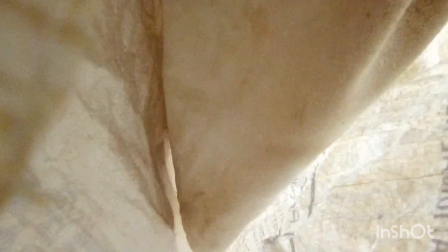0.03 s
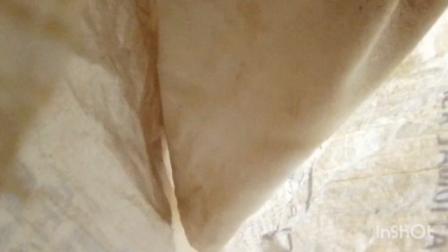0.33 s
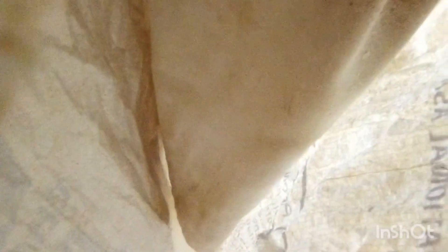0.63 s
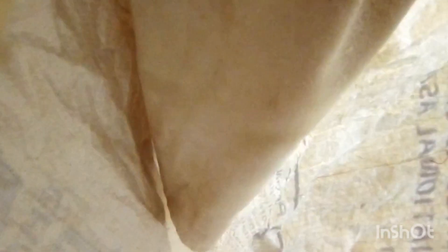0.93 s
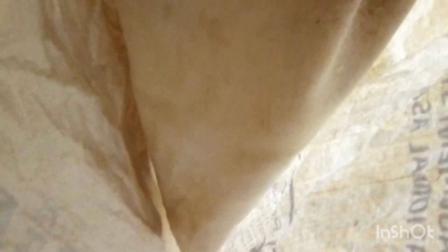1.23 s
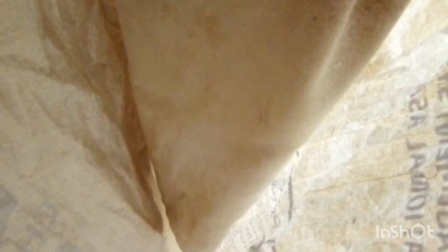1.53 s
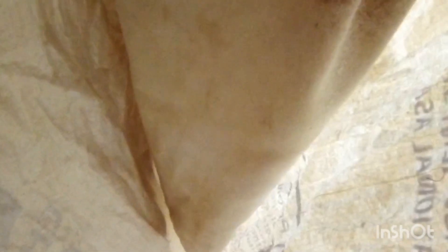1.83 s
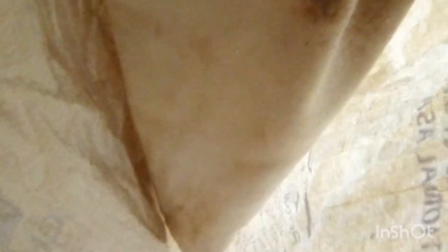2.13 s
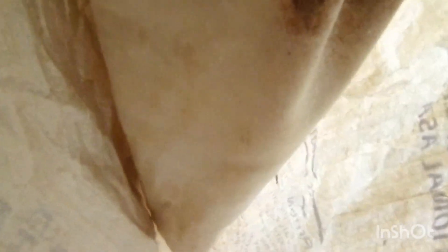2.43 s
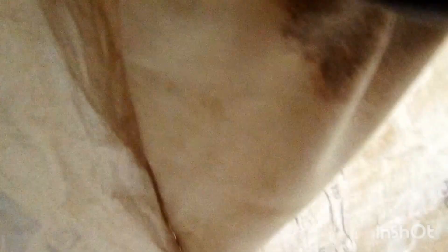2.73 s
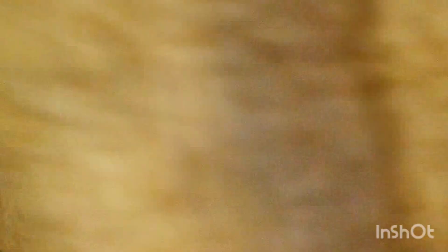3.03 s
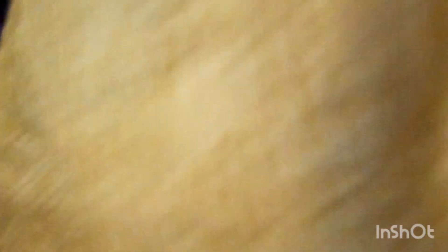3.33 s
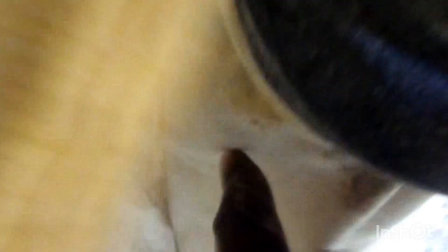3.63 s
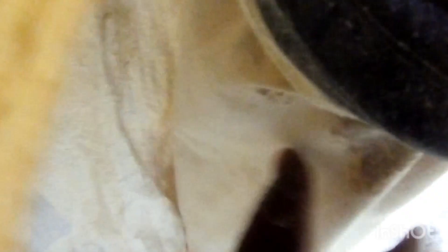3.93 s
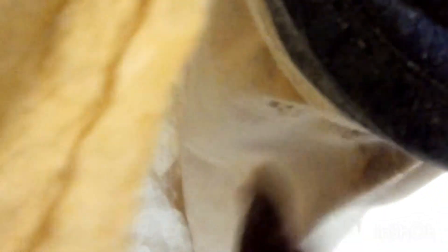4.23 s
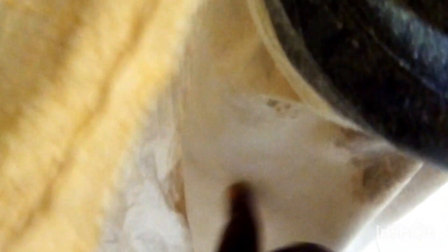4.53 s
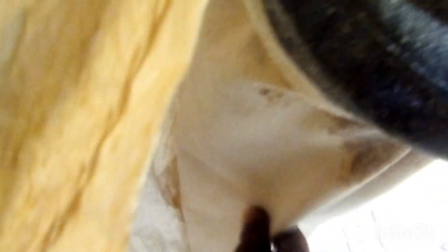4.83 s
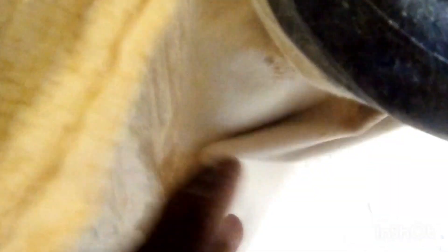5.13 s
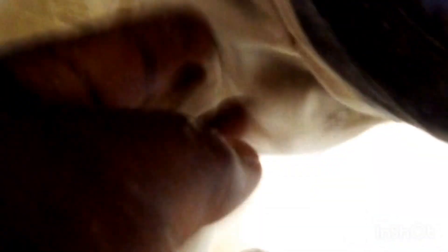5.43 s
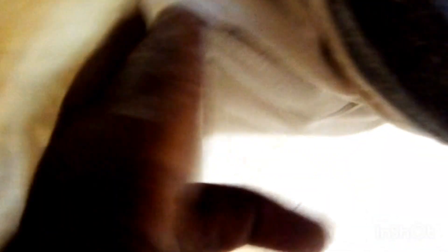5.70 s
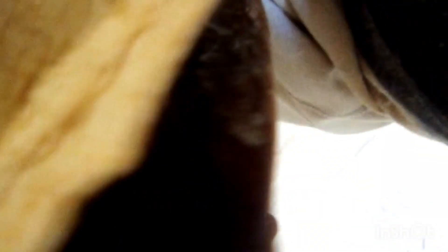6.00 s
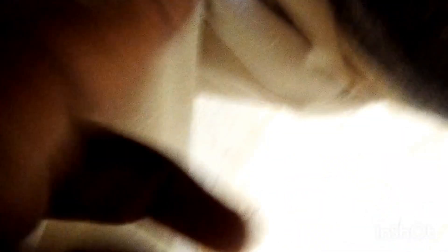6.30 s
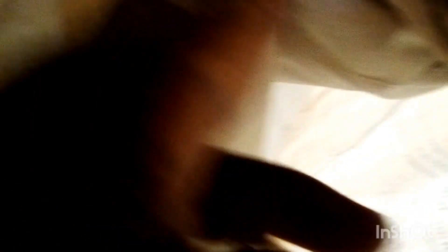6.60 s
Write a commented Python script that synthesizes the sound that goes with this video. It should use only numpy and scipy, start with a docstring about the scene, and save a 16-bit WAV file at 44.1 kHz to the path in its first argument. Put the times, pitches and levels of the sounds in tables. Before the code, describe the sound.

An electric grain mill runs without a break, heard from close by. Grain rushing against the steel casing makes a loud, bright hiss, over the rotor's deep hum, a roar of air and a light buzzing rattle. The hiss swells and dips slightly as the feed varies. In the second half, a few single kernels tick faintly on the spout. The microphone moves from the cloth outlet sack up to the spout, changing the tone only a little.

```python
"""An electric grain mill

Grain hisses against the steel casing, and now and then a single kernel ticks on the spout.
The rotor hums at 65 turns a second, with side tones from a slower shaft or bearing, and drives
roaring air through the casing. The listener moves from the cloth sack on the outlet up to the spout."""
import sys
import numpy as np
from scipy import signal
from scipy.fft import rfft, irfft, next_fast_len
from scipy.io import wavfile
from scipy.ndimage import uniform_filter1d, map_coordinates

SR = 44100
rng = np.random.default_rng(int(sys.argv[2]) if len(sys.argv) > 2 else 0)


def store_wav(level_fs):
    """Save 16-bit WAV to argv[1]."""
    pcm = np.round(np.clip(np.atleast_2d(level_fs), -1, 1) * 32767)
    wavfile.write(sys.argv[1], SR, pcm.T.astype(np.int16))


N = 293706
TIME = np.arange(N) / SR
ROTOR_HZ, SLOW_HZ = 65.055, 24.87


def grain(clock, place, flow_db, clump_db=0.5, fine_clump_db=1.0, throb=0.048):
    """Impact excitation: clumps of grain ring the steel near 4.6 kHz; fine meal adds a thin spray."""
    # Each row of these spectra: frequency in Hz, relative spectral density in dB.
    steel_spectrum = [(100, -50), (900, -25), (2000, -18.5), (2800, -14), (3500, -8), (4000, -2), (4600, 0),
                      (5100, -3.5), (5600, -10.5), (6100, -14.5), (6650, -18.5), (7000, -25), (7500, -29),
                      (8000, -39.5), (11000, -68)]
    spray_spectrum = [(5000, -28), (8200, 0.5), (9500, 0), (10500, -5.5), (11300, -10), (12300, -15),
                      (13400, -17), (15400, -26)]
    sizzle_spectrum = [(7000, -25), (8700, -5), (9800, 1), (10700, -5), (11500, -13), (13400, -16),
                       (15400, -20)]
    # Each row: time in seconds, levels of steel and of spray in dB at an even feed.
    levels = [(0, -18.5, -53), (1.0, -19, -54), (2.7, -19, -54.5), (3.5, -18.5, -53.6), (4.3, -18.6, -52),
              (5.2, -19, -53.8), (6.66, -19.5, -54)]
    clumps = drift(44)
    pulsation = 1 + throb * np.sin(2 * np.pi * (ROTOR_HZ + 2 * SLOW_HZ) * clock)
    steel = coloured(impacts(per_s=22000, spread_db=2.1) * pulsation, steel_spectrum)
    steel = strike_colour(steel, bright_db=0.26 * flow_db + 0.45 * drift(14))
    spray = coloured(impacts(per_s=14000, spread_db=2.2), spray_spectrum)
    sizzle = coloured(impacts(per_s=5000, spread_db=2.0), sizzle_spectrum)
    share = 0.4 * np.clip(place, 0, 1)  # the spout sizzles once the sack no longer covers it
    meal = np.sqrt(1 - share) * spray + np.sqrt(share) * sizzle
    steel_db = curve(levels, column=1) + flow_db + clump_db * clumps
    meal_db = curve(levels, column=2) + 1.2 * flow_db + fine_clump_db * clumps
    return steel * gain_of(steel_db) + meal * gain_of(meal_db)


def strike_colour(x, bright_db, patchy_db=0.71, patch_hz=700, patch_s=0.038, pivot_hz=4900):
    """Timbre depends on the blow: it shifts with the spot struck, and harder blows ring brighter."""
    hz, t, spectra = signal.stft(x, SR, nperseg=512, noverlap=384)
    patches = rng.standard_normal(spectra.shape)
    patches = uniform_filter1d(patches, round(patch_hz / hz[1]), axis=0)
    patches = unit_rms(uniform_filter1d(patches, round(patch_s / t[1]), axis=1))
    shelf = np.tanh(2 * np.pi * np.log((hz[:, None] + 1) / pivot_hz))
    spectra *= gain_of(patchy_db * patches + shelf * np.interp(t, TIME, bright_db))
    return unit_rms(signal.istft(spectra, SR, nperseg=512, noverlap=384)[1][:N])


def feed(uneven_db=0.29):
    """Modulation by the flow of grain, in dB: slightly uneven, with a bump for each slug or gap."""
    # Each row: midpoint and length in seconds, change of flow in dB (slug +, gap -).
    surges = [(.89, .14, -1.7), (1.288, 0.14, 2.3), (1.777, 0.072, 2), (2.26, 0.068, 1.5),
              (2.586, 0.084, -3.5), (2.802, 0.047, 1.8), (3.3, 0.087, 2.8), (3.487, .09, 3),
              (3.9, .07, 2.2), (4.05, .07, 2), (4.47, 0.17, -2), (4.564, 0.063, 2.5), (6.28, .07, 3)]
    flow_db = uneven_db * drift(14)
    for middle, length, db in surges:
        flow_db += db * np.cos(np.pi * np.clip((TIME - middle) / length, -.5, .5)) ** 2
    return flow_db


def rotor_drone(clock, waver_db=0.2):
    """Periodic forcing: two pulses to each turn of the rotor give the deep main tone."""
    # Each row: time in seconds, level in dB.
    levels = [(0, -29.3), (2.15, -29.5), (2.42, -29.5), (2.53, -29), (2.63, -29), (2.95, -28.5), (3.2, -28),
              (3.4, -30.5), (3.88, -28), (4.22, -28), (4.4, -33), (4.49, -25), (4.58, -29), (5.9, -27.5),
              (6.5, -27), (6.66, -25.5)]
    level_db = curve(levels) + waver_db * drift(8.2)
    return np.sqrt(2) * gain_of(level_db) * np.sin(2 * np.pi * 2 * ROTOR_HZ * clock)


def rotor_hum(clock, place, harmonic_gain_db=0.38):
    """Harmonics and sidebands: the rotor's tones vary with place; the slow rotation adds side tones."""
    # Each row: harmonic number, relative levels in dB by the sack, by the spout and under the spout.
    harmonics = [(1, -45.5, -45.5, -45), (3, -32, -35.5, -33), (4, -37, -62, -45.5), (5, -42.5, -57, -45.5),
                 (6, -36, -35.5, -41), (7, -33, -39.5, -38), (8, -47, -39.5, -34.5), (9, -45, -43.5, -43),
                 (10, -35.5, -35, -33), (11, -43, -43, -40), (12, -58, -45, -55), (13, -54, -51, -50),
                 (14, -45, -46, -43)]
    # Each row: multiple of the rotor's speed, multiple of the slow speed added to it, level in dB.
    sidebands = [(1, 3, -45.5), (4, -2, -44.5), (4, -1, -44.5), (5, -1, -44), (7, 2, -40.5), (8, -1, -43),
                 (8, 1, -46), (9, -2, -46.5), (9, 2, -42), (11, 2, -48.5), (17, -1, -51)]

    def tone(hz, waver):
        amplitude = np.sqrt(2) * (1 + waver * drift(2.25))
        return amplitude * np.sin(2 * np.pi * (hz * clock + rng.random()))

    main = sum(np.interp(place, [0, 1, 2], gain_of(levels)) * tone(n * ROTOR_HZ, waver=0.15)
               for n, *levels in harmonics)
    sides = sum(gain_of(db) * tone(n * ROTOR_HZ + m * SLOW_HZ, waver=0.23) for n, m, db in sidebands)
    return gain_of(harmonic_gain_db) * main + sides


def air(gust_db=1.04):
    """Turbulence: the air that the rotor drives through the casing makes a gusty broadband roar."""
    # Each row: frequency in Hz, relative spectral density in dB.
    spectrum = [(20, -29), (55, -26), (90, -6), (122, 3), (165, -6.5), (205, 0), (250, 1.5), (315, 2),
                (400, -1.5), (600, 0.5), (760, -7), (930, -2), (1020, -8.5), (1350, -6), (1650, -12),
                (3500, -32), (9000, -58)]
    return coloured(rng.standard_normal(N), spectrum) * gain_of(gust_db * drift(12))


def casing_rattle(clock):
    """Intermodulation: the casing buzzes on a dense comb of combination tones of the two rotations."""
    # Each row: frequency in Hz, relative level of the tones in dB.
    spectrum = [(150, -31), (220, -3), (550, 0), (800, -5.5), (1400, -10), (2600, -14)]
    hz = (np.arange(3, 40)[:, None] * ROTOR_HZ + np.arange(-4, 5) * SLOW_HZ).ravel()
    size = next_fast_len(2 * N)
    phasors = np.exp(2j * np.pi * rng.random(len(hz)))
    comb = np.zeros(size // 2 + 1, complex)
    comb[np.round(hz * size / SR).astype(int)] = gain_at(spectrum, hz) * phasors
    buzz = irfft(comb, size)
    return unit_rms(map_coordinates(buzz, [clock * SR], order=1, mode="wrap"))  # follows the speed


def kernel_ticks(t60_s=0.0098, band_hz=(8500, 13000), gain_db=-2):
    """Damped transients: single kernels strike the spout, each a bright, fast-decaying noise burst."""
    # Each row: start in seconds, relative level in dB.
    strikes = [(3.4845, -42), (3.8881, -43), (4.1355, -35), (4.369, -43), (4.56, -45), (4.9541, -32),
               (5.89, -45), (6.2706, -46), (6.4787, -35)]
    t, ticks = np.arange(SR // 20) / SR, np.zeros(N)
    for start, db in strikes:
        burst = gain_of(db + gain_db - 60 * t / t60_s) * rng.standard_normal(len(t))
        span = ticks[round(start * SR):][:len(t)]
        span += burst[:len(span)]
    return signal.sosfilt(signal.butter(1, band_hz, "band", fs=SR, output="sos"), ticks)


def motor_frame():
    """Steady vibration: the motor and its stand radiate faint low tones."""
    # Each row: frequency in Hz, level in dB.
    tones = [(19.9, -50), (30.2, -54), (49.75, -51.5), (82.7, -51), (100, -54), (127.1, -54)]
    return np.sqrt(2) * sum(gain_of(db) * np.sin(2 * np.pi * (hz * TIME + rng.random()))
                            for hz, db in tones)


def impacts(per_s, spread_db):
    """Shot noise: random clicks, most small and a few large."""
    strength = gain_of(spread_db * np.minimum(rng.exponential(1, N), 5))
    return unit_rms(strength * rng.choice([-1., 1.], N) * (rng.random(N) < per_s / SR))


def drift(rate_hz, size=2048):
    """Low-pass noise of rms 1, with changes up to about the given rate."""
    hz = np.fft.rfftfreq(size, N / SR / size)
    slow = irfft(rfft(rng.standard_normal(size)) / np.sqrt(1 + (hz / rate_hz) ** 4))
    return np.interp(TIME, np.linspace(0, N / SR, size), unit_rms(slow))


def coloured(x, spectrum):
    """Linear filtering: shapes x by a spectrum, at rms 1."""
    size = next_fast_len(N + 4096)
    response = gain_at(spectrum, np.fft.rfftfreq(size, 1 / SR))
    return unit_rms(irfft(rfft(x, size) * response, size)[:N])


def gain_at(spectrum, hz):
    """Gain of a spectrum, interpolated in log frequency."""
    knots_hz, db = np.transpose(spectrum)
    return gain_of(np.interp(np.log(hz + 1), np.log(knots_hz + 1), db))


def curve(rows, column=1):
    """One column of a time table, interpolated at every sample."""
    rows = np.asarray(rows)
    return np.interp(TIME, rows[:, 0], rows[:, column])


def gain_of(db):
    """Decibels to an amplitude ratio."""
    return 10 ** (np.asarray(db) / 20)


def unit_rms(x):
    """Normalisation to rms 1."""
    return x / np.sqrt(np.mean(x ** 2) + 1e-20)


def scene(wander=0.000714, air_db=-5.0, rattle_db=-8.0):
    """Superposition: the mill's sources add, and both channels carry the same sound."""
    # Each row: time in seconds, listener's place (0 by the sack, 1 by the spout, 2 under it).
    path = [(0, 0), (2.0, 0), (2.9, 1), (4.6, 0.5), (5.2, 1.5), (6.66, 1)]
    # Each row: time in seconds, relative level of air and rattle in dB.
    roar_levels = [(0, -24.5), (1.95, -25), (2.25, -27), (2.5, -24.5), (3.5, -26), (4.06, -25), (4.38, -28),
                   (4.6, -26), (5.9, -25), (6.66, -23)]
    clock = np.cumsum(1 + wander * drift(2.39)) / SR  # the load makes the speed wander
    place, flow_db = curve(path), feed()
    roar = gain_of(air_db) * air() + gain_of(rattle_db) * casing_rattle(clock)
    roar *= gain_of(curve(roar_levels) + 0.17 * flow_db)
    machine = rotor_drone(clock) + rotor_hum(clock, place) + motor_frame() + roar
    mill = machine + grain(clock, place, flow_db) + kernel_ticks()
    return np.array([mill, mill])


def record(dry, cutoff_hz=15450):
    """Band limiting: a steep low-pass filter removes the highest treble."""
    lowpass = signal.firwin(511, cutoff_hz, window=("kaiser", 9), fs=SR)
    return signal.oaconvolve(dry, lowpass[None], "same")


dry = scene()
out = record(dry)
store_wav(out)
```